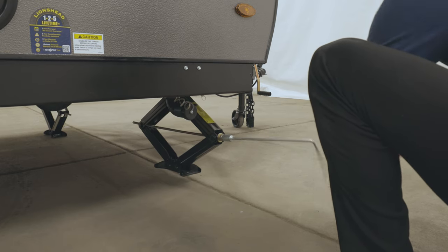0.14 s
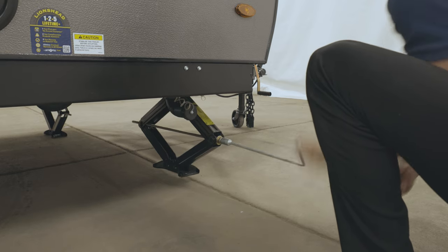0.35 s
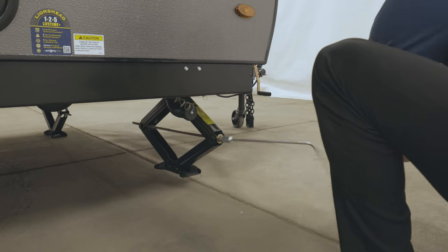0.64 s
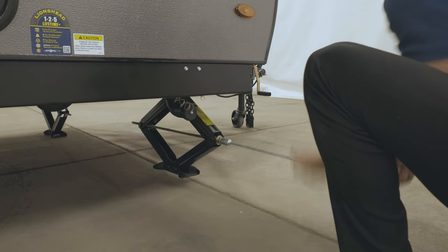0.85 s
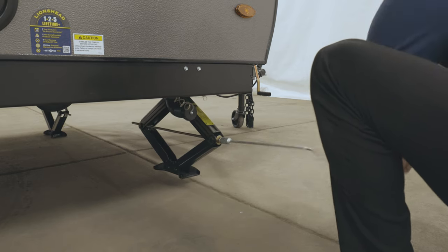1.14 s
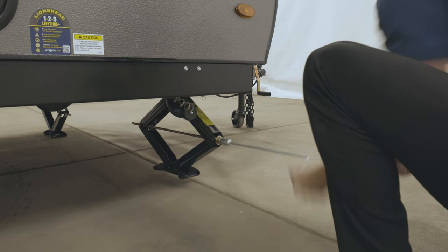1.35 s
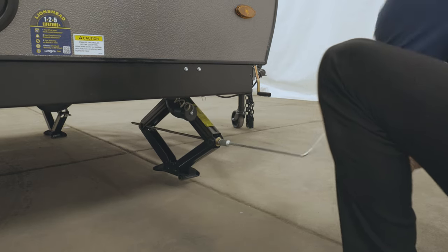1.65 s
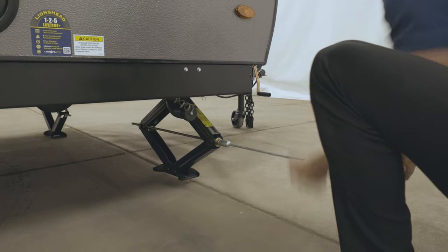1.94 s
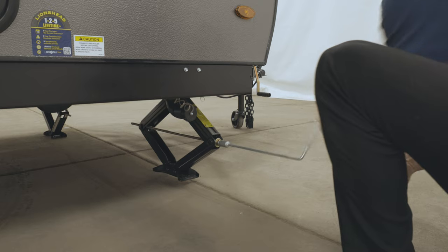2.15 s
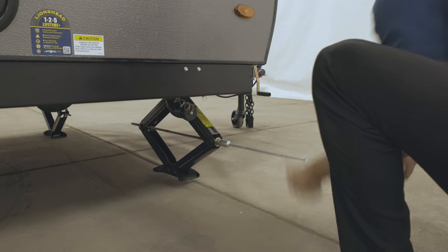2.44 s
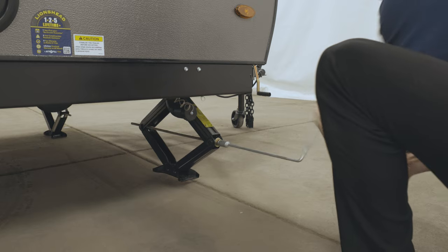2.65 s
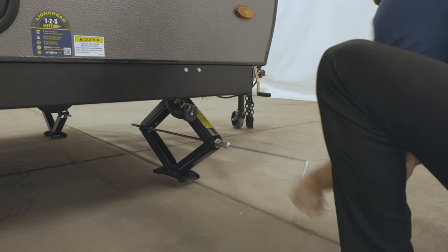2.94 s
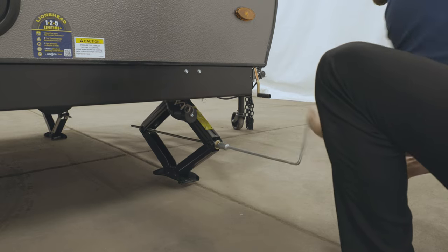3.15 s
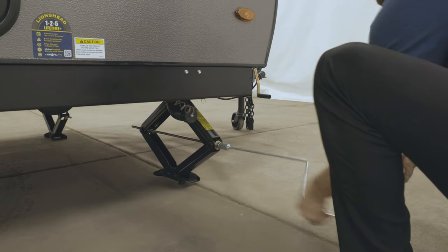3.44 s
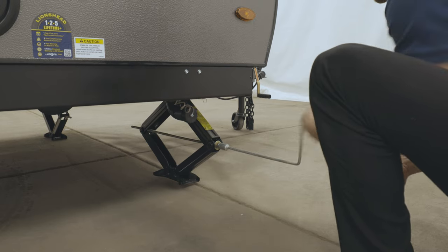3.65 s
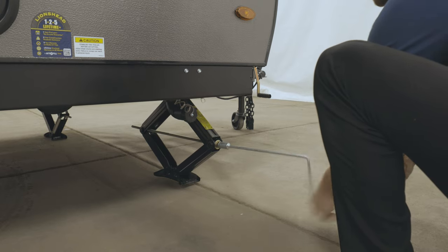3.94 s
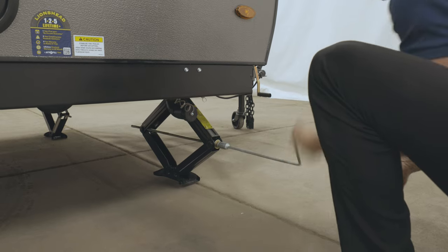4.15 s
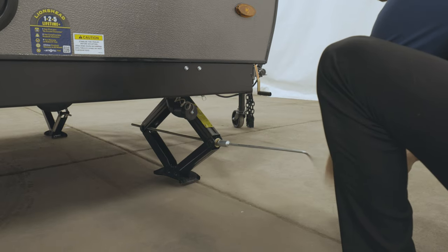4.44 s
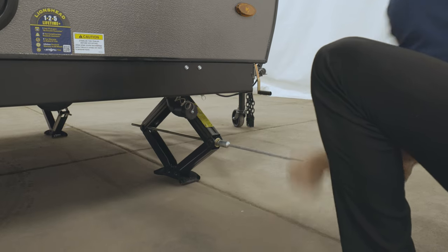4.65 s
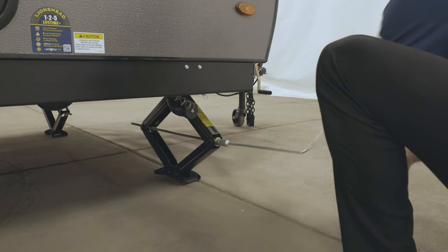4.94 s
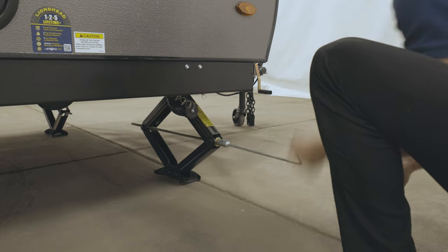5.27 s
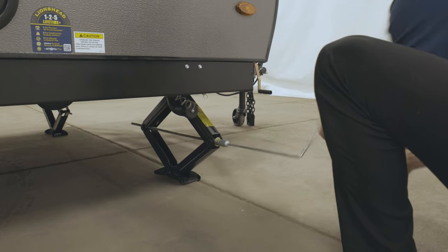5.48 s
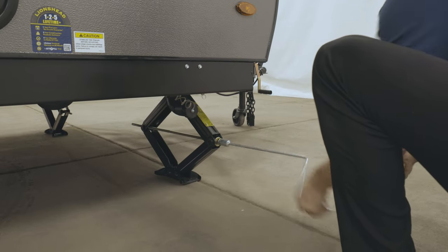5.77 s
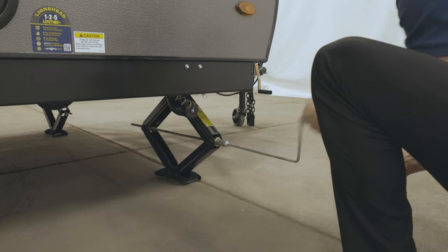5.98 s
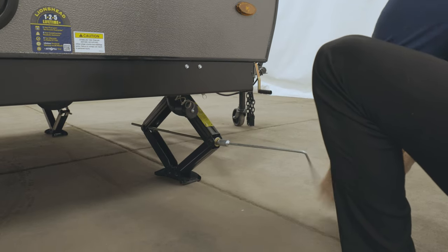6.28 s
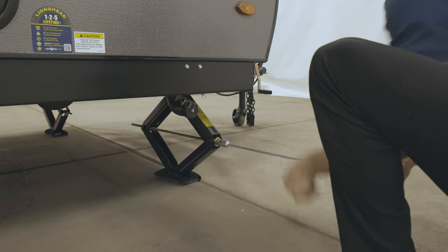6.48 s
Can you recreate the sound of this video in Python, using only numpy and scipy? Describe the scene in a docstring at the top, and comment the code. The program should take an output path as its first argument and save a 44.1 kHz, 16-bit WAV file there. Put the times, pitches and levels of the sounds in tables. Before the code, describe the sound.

A camper's scissor jack is wound by hand in a large, echoing hall with a concrete floor, heard fairly close over faint air noise and hum. The screw grinds roughly with each push, about every half second, strongest near 0.5 s. Frame clunks and bright steel chatter crowd the first two seconds, with sharp ringing rattles around 0.45, 1.0 and 1.5 s and thin pivot chirps at 0.2 and 0.75. Around 2.4 s a hand slides along the rod with a bright hiss. From 2.6 to 4.2 s the knocks are softer and duller, with low floor rumble around 3.3 and 3.8. A small squeak at 4.6 precedes a heavy clunk at 4.8; another lands at 5.35. The grinding weakens after 5.5 s, a rattle comes at 5.95, and a loose socket clacks crisply at 6.26 and hardest at 6.4, as small creaks and ticks fade.

```python
"""In a large hall with a concrete floor, a steel hand crank winds a camper's scissor jack.
The screw grinds and the floor rumbles with each push, from noise made of many small slips.
The frame clunks, the crank chatters and rings: bursts of tiny impacts set off dying sines and noise.
Pivots chirp with wavering tones, and a hand slides on the rod as bright friction noise.
Near the end the loose socket clacks on the nut. Echoes of the hall surround the jack."""
import sys
import numpy as np
from scipy import signal
from scipy.fft import rfft, irfft
from scipy.io import wavfile
from scipy.ndimage import uniform_filter1d

SR = 44100
rng = np.random.default_rng(int(sys.argv[2]) if len(sys.argv) > 2 else 0)


def wav_out(sig):
    """Save sig, one row per channel (or a flat mono array), as 16-bit PCM at SR to the path in sys.argv[1]."""
    wavfile.write(sys.argv[1], SR, np.round(np.clip(np.atleast_2d(sig).T, -1, 1) * 32767).astype(np.int16))


N = 291670
TIME = np.arange(N) / SR  # seconds through the scene
AGE = TIME[:SR // 3]  # seconds since a single blow began


def gain_of(db):
    """Turns decibels into gain."""
    return 10 ** (np.asarray(db) / 20)


def evened(x):
    """Scales a sound to rms 1."""
    return x / np.sqrt(np.mean(x ** 2) + 1e-20)


def unit(x):
    """Scales a sound to energy 1."""
    return x / np.linalg.norm(x)


def read(points, hz):
    """Reads a table of frequencies and values, with pitch steps evenly spaced."""
    table_hz, value = np.transpose(points)
    return np.interp(np.log(hz + 1), np.log(table_hz + 1), value)


def filtered(x, spectrum):
    """Raises or lowers each frequency by the dB in a table."""
    gain = gain_of(read(spectrum, np.fft.rfftfreq(N, 1 / SR)))
    return irfft(rfft(x) * gain, N)


def add(mix, start, sound):
    """Mixes a sound in, starting at the given second."""
    part = mix[max(round(start * SR), 0):][:len(sound)]
    part += sound[:len(part)]


def slips(colour, grain_db, per_s):
    """Friction is many small slips of uneven size; their colour is set by a table, at rms 1."""
    sizes = gain_of(grain_db * np.minimum(rng.exponential(1, N), 4))
    happens = rng.random(N) < per_s / SR
    return evened(filtered(rng.standard_normal(N) * sizes * happens, colour))


SCATTER_DB = 2.5  # typical change in a mode's strength from blow to blow


def ring(modes, detune):
    """Dying sines; each blow lands elsewhere and weighs them anew, with slightly shifted pitches."""
    hz, db, t60 = np.transpose(modes)[:, :, None]
    weight, shift, turn = rng.standard_normal((3, len(modes), 1))
    waves = np.sin(2 * np.pi * (hz * (1 + detune * shift) * AGE + turn))
    level_db = db + SCATTER_DB * weight - 60 * AGE / t60
    return unit((gain_of(level_db) * waves).sum(0))


def as_modes(resonances):
    """A wide resonance is a short mode that starts louder."""
    return [(hz, db + 20 * np.log10(width), np.log(1000) / np.pi / width)
            for hz, width, db in resonances]


def clatter(t60, soft_hz):
    """Countless overlapping modes of sheet steel make dying noise, weaker above soft_hz."""
    pole = np.exp(-2 * np.pi * soft_hz / SR)
    dense = signal.lfilter([1], [1, -pole], rng.standard_normal(len(AGE)))
    return unit(dense * np.exp(-np.log(1000) * AGE / t60))


def crack(soft_hz):
    """The bare contact click, dull above soft_hz."""
    return unit(np.exp(-2 * np.pi * soft_hz * AGE))


REBOUNDS_PER_S = 260
REBOUND_SOFT_HZ = 4860  # rebounds are gentler than the blow, and so duller


def contact(swell, settle, grain_db, seat_db, rebound_db):
    """Loose steel chatters: tiny impacts grow until the parts seat with one firm blow, then rebound."""
    rise = np.minimum(AGE / swell, 1)
    since = np.maximum(AGE - swell, 0)
    sizes = gain_of(grain_db * np.minimum(rng.exponential(1, len(AGE)), 4))
    chatter = rise * np.exp(-since / settle) * sizes * rng.standard_normal(len(AGE))
    seat = signal.unit_impulse(len(AGE), round(swell * SR))
    rebounds = rng.standard_normal(len(AGE)) * (rng.random(len(AGE)) < REBOUNDS_PER_S / SR)
    rebounds *= (since > 0) * np.exp(-since / 0.046)
    pole = np.exp(-2 * np.pi * REBOUND_SOFT_HZ / SR)
    rebounds = signal.lfilter([1], [1, -pole], rebounds)
    return unit(chatter) + gain_of(seat_db) * seat + gain_of(rebound_db) * unit(rebounds)


BLOW_S = 0.03  # a blow's level is set over its first moments


def evened_start(x):
    """Scales so that the first moments of a blow have rms 1."""
    return x / np.sqrt(np.mean(x[:round(BLOW_S * SR)] ** 2) + 1e-20)


def blow(force, body, edges, levels_db):
    """The force rings a body; its low, middle and high registers each get their own level."""
    sound = signal.fftconvolve(force, body)[:len(AGE)]
    out = 0
    for low_hz, high_hz, db in zip(edges, edges[1:], levels_db):
        band = signal.butter(3, (low_hz, high_hz), "band", fs=SR, output="sos")
        out = out + gain_of(db) * evened_start(signal.sosfilt(band, sound))
    return out


def rattle(body, edges, per_s):
    """Small stray contacts ring a body at random moments, at rms 1."""
    taps = rng.uniform(-1.53, 1, N) * (rng.random(N) < per_s / SR)
    force = contact(0.0012, settle=0.0053, grain_db=-1, seat_db=-6, rebound_db=-18)
    return evened(signal.oaconvolve(taps, blow(force, body, edges, [0]))[:N])


# The colour of still air. Each row: frequency in Hz, relative level in dB per Hz.
AIR_COLOUR = [(20, -31), (60, -1.5), (120, -10.5), (240, -4), (480, -10), (650, -7.5), (1000, -19.5),
              (1250, -11.5), (1900, -22.5), (3200, -21), (6000, -26), (9000, -36.5), (13000, -24),
              (16000, -21.5)]
AIR_DB = -57.5
# The mains hum. Each row: frequency in Hz, level in dB.
HUM_TONES = [(120.5, -69.5), (241, -62), (361, -68.5)]


def background():
    """Still air is soft noise, and a faint mains hum is a few steady sines."""
    air = gain_of(AIR_DB) * evened(filtered(rng.standard_normal(N), AIR_COLOUR))
    hum = sum(gain_of(db) * evened(np.sin(2 * np.pi * (hz * TIME + rng.random())))
              for hz, db in HUM_TONES)
    return air + hum


# Each turn of the crank loads the screw once.
# Each row: hardest push in seconds, effort in dB, extra weight passed to the trailer floor in dB.
CRANK_TURNS = [(0.02, -0.5, 11), (0.47, 7.5, -5), (1.05, -3.5, 1), (1.56, 2, -10), (1.88, 0, 3),
               (2.35, 1.5, -2), (2.7, 2, -10), (3.27, -6.5, 16), (3.77, -3, 11.5), (4.3, -0.5, -16),
               (4.84, -3, 4.5), (5.4, -2, 12), (5.98, -26, -3.5), (6.46, -10, 20)]
PUSH_RISE_DB_PER_S, PUSH_FALL_DB_PER_S = 151, 85  # the load builds and lets go
COAST_DB = -17  # effort between pushes


def effort():
    """Loads on screw and trailer floor, as gains: they build towards each push and let go after it."""
    screw = floor = gain_of(COAST_DB) ** 2
    for s, db, weight_db in CRANK_TURNS:
        away_db = np.maximum((s - TIME) * PUSH_RISE_DB_PER_S, (TIME - s) * PUSH_FALL_DB_PER_S)
        screw = screw + gain_of(db - away_db) ** 2
        floor = floor + gain_of(db + weight_db - away_db) ** 2
    return np.sqrt(screw), np.sqrt(floor)


# The colour of the grinding. Each row: frequency in Hz, relative level in dB per Hz.
SCREW_COLOUR = [(60, -24), (130, 10), (190, -9.5), (330, 7.5), (480, 2), (650, 6.5), (900, -15), (1250, 5),
                (1900, -26), (4000, -42.5), (7000, -55.5), (14000, -60)]
GRIND_DB = -44.5  # before the hall, at an effort of 0 dB


def grind(load):
    """The screw thread grinds as rough friction that follows the load."""
    return gain_of(GRIND_DB) * load * slips(SCREW_COLOUR, grain_db=5.5, per_s=650)


# The colour of the rumble. Each row: frequency in Hz, relative level in dB per Hz.
FLOOR_COLOUR = [(25, -32), (50, -33), (72, 2.5), (100, 5), (130, 3), (165, 7), (200, -8.5), (500, -46)]
RUMBLE_DB = -54  # at a weight of 0 dB


def rumble(weight):
    """The trailer floor rumbles: sparse low slips that follow the weight on it."""
    return gain_of(RUMBLE_DB) * weight * slips(FLOOR_COLOUR, grain_db=2.5, per_s=140)


# Resonances of the frame. Each row: frequency in Hz, width in Hz, relative level in dB.
FRAME_RESONANCES = [(128, 30, -8), (160, 25, -11), (240, 20, -17), (315, 60, -3), (385, 70, -9),
                    (605, 75, -3), (655, 120, 0), (780, 100, -13), (1070, 140, -11), (1215, 100, -2),
                    (1330, 190, -4), (1540, 240, -9)]
CREAK_DB, CREAKS_PER_S = -47.5, 30  # level before the load, the hollowing and the hall


def creaks():
    """The frame shifts in small jerks, each ringing its resonances."""
    body = ring(as_modes(FRAME_RESONANCES), detune=0.034) + clatter(t60=0.03, soft_hz=1190)
    return gain_of(CREAK_DB) * rattle(body, (300, 2200), CREAKS_PER_S)


# Resonances of the pressed steel arms. Each row: frequency in Hz, width in Hz, relative level in dB.
ARM_RESONANCES = [(2097, 67, 8.5), (2327, 88, 10), (2623, 30, 14), (3189, 230, 11), (3450, 50, 10.5),
                  (4130, 95, 3), (5056, 90, 4), (6540, 160, 2), (6936, 76, 9.5), (7720, 160, 2),
                  (9100, 90, -5), (8400, 43, 2), (9000, 13, -22), (10700, 23, -9), (11900, 92, -3.5)]
RATTLE_DB, RATTLES_PER_S = -51.5, 35  # level before the load and the hall


def rattles():
    """The slack arms tick against their rivets in small random contacts."""
    body = ring(as_modes(ARM_RESONANCES), detune=0.0055) + 1.4 * clatter(t60=0.05, soft_hz=1200)
    return gain_of(RATTLE_DB) * rattle(body, (1100, 6000), RATTLES_PER_S)


TICK_DB, TICKS_PER_S = -56.5, 12  # level before the load and the hall


def ticks():
    """The swivel of the crank ticks faintly: short bright noise at random moments."""
    return gain_of(TICK_DB) * rattle(clatter(t60=0.03, soft_hz=4950), (2500, 14000), TICKS_PER_S)


# The hand slides along the rod.
# Each row: strongest moment in seconds, level in dB before the hall, half length in seconds.
HAND_SLIDES = [(2.369, -45, 0.089), (2.54, -55.5, 0.069), (3.08, -62.5, 0.045), (3.51, -62.5, 0.039),
               (4.642, -56.5, 0.085), (6.083, -48, 0.035)]
# The colour of skin on steel. Each row: frequency in Hz, relative level in dB per Hz.
PALM_COLOUR = [(880, -43.5), (1500, -19.5), (1810, -7.5), (2300, 4.5), (2910, -7), (4920, -0.5), (7920, -2),
               (16000, -23)]
GRIP_DB = -57  # before the hall, at an effort of 0 dB


def palm(load):
    """The rod turns in the hand, which now and then slides along it: fine friction noise."""
    slides = sum(gain_of(db) * np.exp(-((TIME - s) / half) ** 2) for s, db, half in HAND_SLIDES)
    grip = gain_of(GRIP_DB) * load
    return (grip + slides) * slips(PALM_COLOUR, grain_db=-2.5, per_s=6400)


# The jack frame knocks. Each row: start in seconds, level in dB before the trims and the hall,
# boom and clank in dB relative to that level, swell in seconds.
FRAME_KNOCKS = [(0.005, -34.5, -15, -9.5, .0057), (0.069, -52.5, -14, 9, .0025),
                (0.197, -38.5, -12.5, -5, 0.0021), (0.229, -42, -10, 3, 0.0081),
                (0.338, -34, -15, 6, .0031), (0.442, -24, -27, 0.5, 0.0073),
                (0.742, -33.5, -8, -4.5, 0.00084), (0.887, -30.5, -22, -5, 0.0048),
                (0.955, -27, -20, -2, 0.0053), (0.985, -30.5, -24, 7.5, .0044),
                (1.035, -21.5, -17, -20.5, 0.0018), (1.187, -29.5, -21, 3.5, 0.0059),
                (1.488, -24, -15, 1, 0.0071), (1.511, -27.5, -24, 1, 0.0088),
                (1.573, -28.5, -11, -2.5, .006), (1.732, -49.5, -11, 17, 0.00117),
                (1.772, -49.5, -10, 15, 0.00183), (1.918, -37, -7, 0, 0.0017),
                (1.942, -33, -36, -26, .0062), (2.123, -27.5, -29, -25, 0.0041),
                (2.137, -30.5, -8, 3, 0.0055), (2.235, -34.5, -7, -12, 0.0012),
                (2.33, -44, -4, -9, 0.00256), (2.426, -27, -11, 4.5, 0.0083), (2.58, -28.5, -7, -1, .003),
                (2.729, -48.5, -10, 11, .0041), (2.882, -39.5, -4, 4.5, .0034),
                (3.121, -42, -3.5, 7.5, .0045), (3.199, -32.5, -21, -6, 0.0013),
                (3.316, -48, -9, 16.5, 0.0019), (3.643, -39.5, -1.5, 0.5, 0.012),
                (3.699, -35.5, -25, -12, 0.0036), (3.728, -30.5, -5.5, -5.5, 0.0097),
                (3.79, -36, -12, -1.5, 0.0018), (3.889, -40.5, -1, -30, 0.0022),
                (4.201, -34.5, -25, -19, 0.0098), (4.25, -33, -19, -2, 0.0061),
                (4.299, -29.5, -13, -8, 0.0075), (4.347, -31, -8.5, -7, .004), (4.739, -38, -12, -7, 0.013),
                (4.763, -29, -21, 6, .006), (4.776, -17, -15.5, -7, 0.002),
                (4.864, -31.5, -14, 1.5, 0.0086), (4.897, -35.5, 0, -4, 0.0063),
                (5.315, -38, -11, -1.5, 0.018), (5.358, -17.5, -13, -4, 0.0015),
                (5.445, -33, -1, 0, 0.00043), (5.528, -32, -19, 4.5, .0013), (5.945, -28.5, -11, -22, .016),
                (5.96, -34, -3, 8, .0029), (6.265, -52.5, -11, 20.5, .0029),
                (6.392, -35.5, 4, 9.5, 0.00095), (6.542, -46, -8, -15, .0037)]
# The colour of rubbing joints. Each row: frequency in Hz, relative level in dB per Hz.
JOINT_COLOUR = [(100, -27.5), (200, -24), (330, 2.5), (490, -9), (650, 9.5), (900, -11), (1280, 2.5),
                (1800, -10), (3000, -9.5), (5000, -27.5), (14000, -45)]


def joints():
    """The riveted joints rub as the load shifts, just before each knock and for a moment after it."""
    power = np.zeros(N)
    for s, db, boom_db, clank_db, swell in FRAME_KNOCKS:
        since = TIME - s - swell
        shape = np.exp(np.minimum(since / 0.0085, -since / 0.016))
        power += (gain_of(db) + gain_of(db + clank_db)) * shape
    return gain_of(-24.5) * np.sqrt(power) * slips(JOINT_COLOUR, grain_db=2.0, per_s=900)


# Edges in Hz of the frame's boom, knock and clank registers.
FRAME_REGISTERS = (110, 480, 950, 2200)


def frame():
    """The scissor frame and the trailer above it take each knock and ring low and short."""
    out = np.zeros(N)
    for s, db, boom_db, clank_db, swell in FRAME_KNOCKS:
        body = ring(as_modes(FRAME_RESONANCES), detune=0.011)
        body += 0.017 * clatter(t60=0.067, soft_hz=1210) + 0.063 * crack(soft_hz=1500)
        force = contact(swell, settle=0.0047, grain_db=3, seat_db=-4.0, rebound_db=-18.5)
        add(out, s, blow(force, body, FRAME_REGISTERS, (db + boom_db, db, db + clank_db)))
    return gain_of(-2.5) * out


HOLLOW_HZ, HOLLOW_Q, HOLLOW_SHARE = 494, 4.8, 0.52


def hollowed(x):
    """The frame radiates poorly between two groups of modes, so part of the sound there is removed."""
    b, a = signal.iirpeak(HOLLOW_HZ, HOLLOW_Q, fs=SR)
    return x - HOLLOW_SHARE * signal.lfilter(b, a, x)


FIZZ_DB, FREE_FIZZ_DB = -5, -11.5  # change in the top register: always, and more with a free rod


def steel_levels(db, bright_db, free=0):
    """Clack, ring and fizz of a steel contact; brightness counts once per register going up."""
    return db, db + bright_db, db + 2 * bright_db + FIZZ_DB + free * FREE_FIZZ_DB


# The crank chatters, steel on steel. Each row: start in seconds, level in dB before the trim and
# the hall, brightness in dB per register, swell in seconds, how far the rod rings free from 0 to 1.
CRANK_CHATTER = [(0.011, -50.5, -10, 0.0018, 0), (0.206, -50, 2.5, 0.0011, .3),
                 (0.226, -33.5, -0.5, 0.012, .2), (0.338, -44, -15, .003, .9),
                 (0.378, -35.5, -10, .001, 0.7), (0.44, -23, 1.5, 0.0069, 0.2),
                 (0.634, -44.5, -5.5, 0.00078, 0.7), (0.961, -35.5, -12, .0022, 0.1),
                 (0.979, -19.5, 1, 0.0067, 0.88), (1.189, -33, -1, 0.0017, 0.43),
                 (1.492, -38, -8, 0.0093, 0.3), (1.517, -23.5, 2, 0.0044, 1), (1.69, -41, -3.5, 0.022, 0.4),
                 (1.728, -31, 4.5, 0.0036, 0.8), (1.772, -32, -2.5, 0.0045, 0),
                 (1.854, -37, -7.5, .0012, 0.83), (1.915, -49, -4.5, 0.0015, 0.2),
                 (2.14, -51, -31, 0.0014, 0.1), (2.328, -42, -2, 0.0034, 0.9),
                 (2.427, -28.5, -12, .001, .3), (2.579, -38.5, 5, 0.0012, 0.13),
                 (2.727, -42.5, -8, 0.014, 0), (2.775, -32.5, -1.5, 0.00052, 0.1),
                 (2.878, -42, -6, .0022, .1), (3.122, -50, -14, 0.0032, 0.1), (3.313, -30.5, 2, 0.0036, 0),
                 (3.335, -31.5, -15, 0.0025, 0), (3.8, -41, -3.5, 0.0036, 0.1),
                 (3.929, -61, 5, 0.0016, 0.1), (4.246, -39, -12.5, .0005, 1),
                 (4.298, -41, -2, 0.00031, 0.1), (4.346, -37, -10, .0015, 0.06),
                 (4.764, -26.5, -5, 0.0037, 0.16), (4.775, -28, -14.5, 0.0013, 0),
                 (4.862, -31, -7.5, .0017, 0.1), (4.897, -46, -6, .001, .1),
                 (4.956, -42.5, -7, .0013, 0.23), (5.355, -33.5, 1, 0.0018, 0.26),
                 (5.431, -50, 3, 0.0024, 0.3), (5.444, -42.5, -5, .0008, .1), (5.524, -33, -1.5, 0.0017, 0),
                 (5.602, -34, -5, 0.0022, .3), (5.953, -28.5, -5.5, 0.0029, 0.6)]
# Modes of the crank rod. Each row: frequency in Hz, relative level in dB, seconds to die by 60 dB.
ROD_MODES = [(2640, -3, .06), (3316, -1, .11), (3415, -2, .1), (4016, -2, .08), (4091, -2, .09),
             (4743, -3, .1), (4950, -2, .06), (5529, -3, .11), (6360, 5, .05), (6560, 2, .04),
             (7224, 0, .06), (8105, -3, .09), (10010, -1, .05), (11435, -7, .1)]
# Edges in Hz of the clack, ring and fizz registers.
STEEL_REGISTERS = (1800, 4500, 9000, 16000)


def crank():
    """Steel chatter rings the jack's arms and, when the grip is loose, the rod."""
    out = np.zeros(N)
    for s, db, bright_db, swell, free in CRANK_CHATTER:
        arms = ring(as_modes(ARM_RESONANCES), detune=0.0081)
        arms += 1.1 * crack(soft_hz=2370) + clatter(t60=0.079, soft_hz=2480)
        body = (1 - 0.098 * free) * arms + 1.6 * free * ring(ROD_MODES, detune=0.00085)
        force = contact(swell, settle=0.008, grain_db=3.0, seat_db=-24.5, rebound_db=-13)
        add(out, s, blow(force, body, STEEL_REGISTERS, steel_levels(db, bright_db, free)))
    return gain_of(0.25) * out


# Soft low bumps. Each row: start in seconds, level in dB.
LOW_BUMPS = [(0.171, -45), (1.385, -50.5), (3.019, -54)]


def bumps():
    """Short swells of bass: a low sine that rises quickly and dies away."""
    out = np.zeros(N)
    t = AGE[:SR // 16]
    swell = t * np.exp(-t / 0.0081) * np.hanning(len(t))
    for s, db in LOW_BUMPS:
        add(out, s, gain_of(db) * evened(np.sin(2 * np.pi * 72 * t) * swell))
    return out


# Dry spots in the pivot chirp.
# Each row: start in seconds, pitch in Hz, level in dB before the hall, length in seconds.
PIVOT_CHIRPS = [(0.194, 10050, -43.5, 0.053), (0.754, 10000, -48.5, 0.046), (3.754, 8950, -57, 0.013),
                (4.607, 6420, -48.5, 0.055)]
CHIRP_WAVER = 0.022  # typical pitch wander, as a share of the pitch


def chirps():
    """Brief stick-slip tones: sines with an unsteady pitch that fade in and out."""
    out = np.zeros(N)
    for s, hz, db, length in PIVOT_CHIRPS:
        n = round(length * SR)
        waver = evened(uniform_filter1d(rng.standard_normal(SR), size=60))[:n]
        tone = np.sin(2 * np.pi * np.cumsum(hz * (1 + CHIRP_WAVER * waver)) / SR)
        add(out, s, gain_of(db) * evened(tone * np.hanning(n)))
    return out


# The loose socket hits the nut. Each row: start in seconds, level in dB before the trim and the hall,
# brightness in dB per register, swell in seconds.
NUT_HITS = [(6.05, -45, 1.5, .0013), (6.081, -47.5, 3.5, 0.0085), (6.161, -53, -1, .0022),
            (6.2626, -30, -2.5, .0014), (6.318, -45, -5, 0.00051), (6.375, -31, -2, 0.005),
            (6.391, -22.5, -1.5, 0.0011), (6.453, -51, -1, 0.012)]
# Resonances of the socket. Each row: frequency in Hz, width in Hz, relative level in dB.
SOCKET_RESONANCES = [(1950, 170, -6), (2320, 130, -3), (2550, 105, 2), (2790, 115, 0), (3800, 200, -10),
                     (4330, 120, -8), (6000, 170, -5), (6600, 220, -9), (7280, 140, -4), (7900, 200, -11),
                     (8330, 140, -8), (9250, 150, -11), (9650, 150, -12), (10400, 160, -14),
                     (12500, 900, -21)]


def socket():
    """The hollow socket clacks sharply on the nut, ringing its own resonances."""
    out = np.zeros(N)
    for s, db, bright_db, swell in NUT_HITS:
        body = ring(as_modes(SOCKET_RESONANCES), detune=0.002)
        body += 0.3 * crack(soft_hz=2500) + 0.45 * clatter(t60=0.1, soft_hz=2500)
        force = contact(swell, settle=0.0091, grain_db=2.5, seat_db=1, rebound_db=-6.5)
        add(out, s, blow(force, body, STEEL_REGISTERS, steel_levels(db, bright_db)))
    return gain_of(1.5) * out


# How long the hall rings. Each row: frequency in Hz, seconds to die by 60 dB.
HALL_DECAY = [(150, 0.88), (600, 0.62), (1400, 0.49), (3500, 0.68), (7000, 0.39), (10000, 0.21),
              (15000, 0.039)]


def echoes(early_db, tail_db):
    """Quick reflections between floor and trailer, then the hall's tail, each band dying at its speed."""
    t = TIME[:SR]
    taps = rng.choice([-1., 1.], SR) * (rng.random(SR) < 4000 / SR)
    early = unit(taps * (t > 0.004) * np.exp(-t / 0.014))
    hz, at, bands = signal.stft(rng.standard_normal(SR), SR, nperseg=256)
    decay = gain_of(-60 * at / read(HALL_DECAY, hz)[:, None])
    tail = signal.istft(bands * decay, SR, nperseg=256)[1][:SR]
    tail = unit(tail * (1 - np.exp(-t / 0.0012)))
    return gain_of(early_db) * early + gain_of(tail_db) * tail


def hall(x, early_db, tail_db, count=3):
    """Arm and crank move through the sound's path, so the pattern of echoes keeps changing."""
    out = x
    for k in range(count):
        # each set of echoes fades in and out in its turn
        share = np.sqrt(2 / count) * np.cos(np.pi * (TIME / 0.8 + k / count))
        out = out + signal.fftconvolve(x * share, echoes(early_db, tail_db))[:N]
    return out


def scene():
    """One effort drives grinding, creaks, rattles and rumble; the jack's parts sound in the same hall."""
    load, weight = effort()
    low = hollowed(frame() + load * creaks()) + joints() + grind(load)
    high = crank() + socket() + chirps() + palm(load) + load * (rattles() + ticks())
    low = hall(low, early_db=-3.5, tail_db=-10.0)
    high = hall(high, early_db=-20.5, tail_db=-15.5)
    return (low + high + rumble(weight) + bumps() + background())[None]


# The microphone's response. Each row: frequency in Hz, level in dB.
MIC_RESPONSE = [(10000, 0), (12500, -4), (14500, -8), (16000, -14)]
EDGE_HZ = 16100  # upper band limit


def record(dry):
    """The microphone rolls off the treble, then a steep filter limits the band."""
    mic = filtered(dry, MIC_RESPONSE)
    limit = signal.firwin(511, EDGE_HZ, window=("kaiser", 9), fs=SR)
    return signal.oaconvolve(mic, limit[None], "same")


dry = scene()
out = record(dry)
wav_out(out)
```